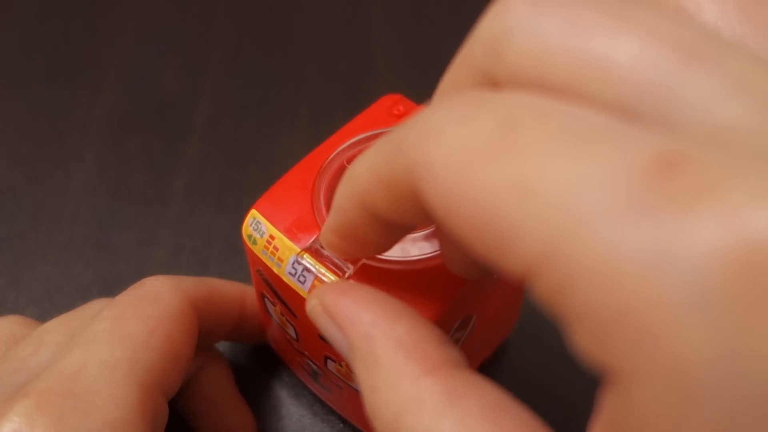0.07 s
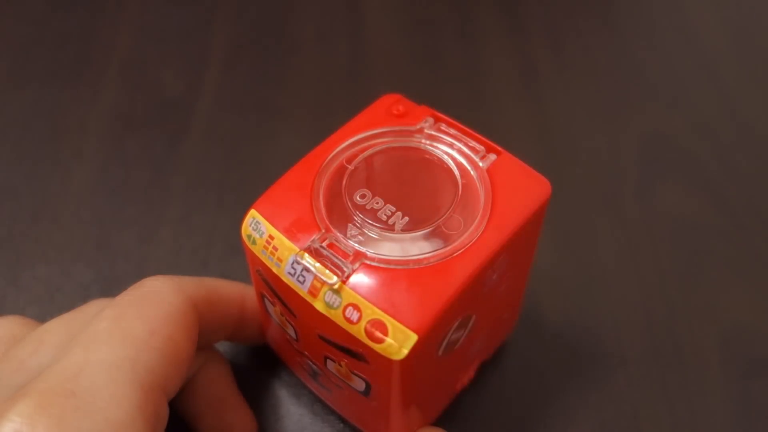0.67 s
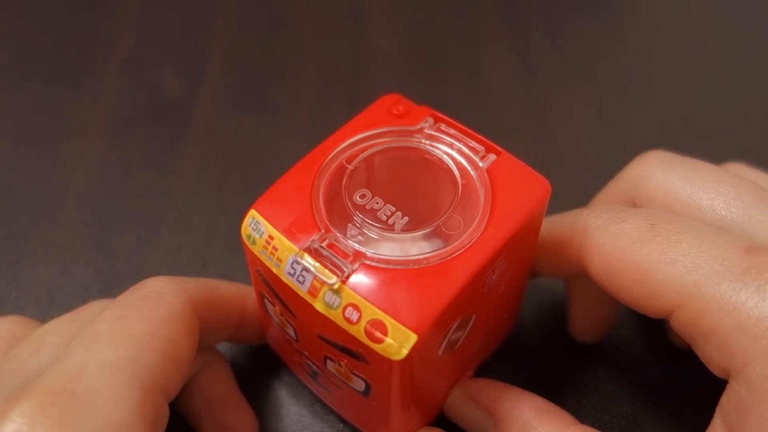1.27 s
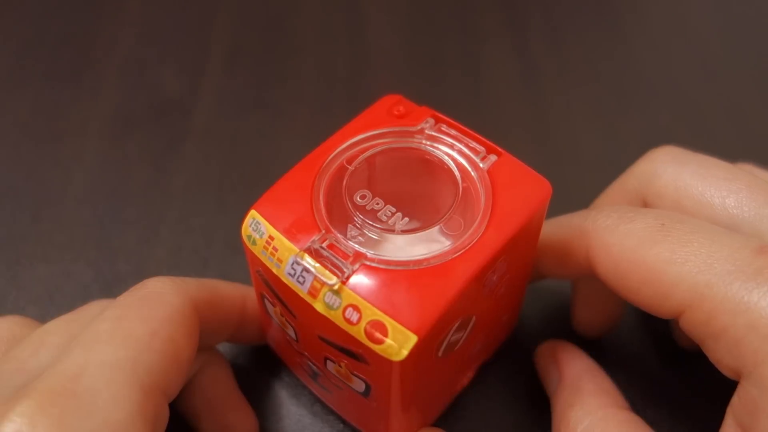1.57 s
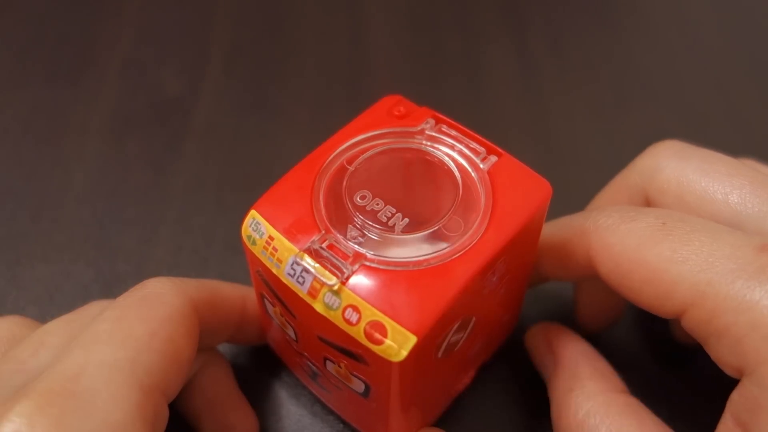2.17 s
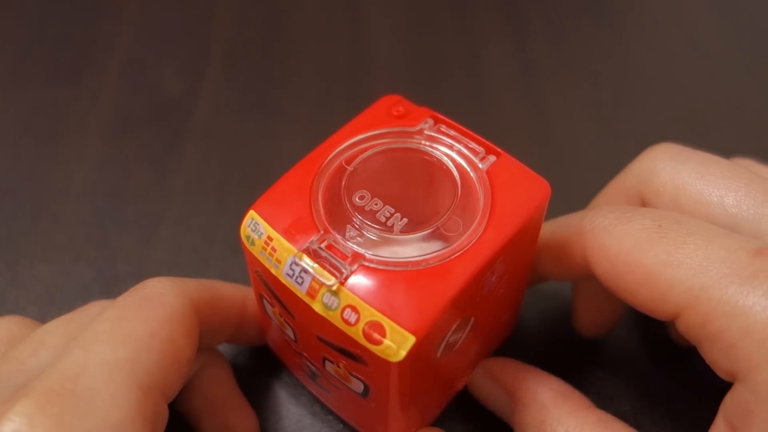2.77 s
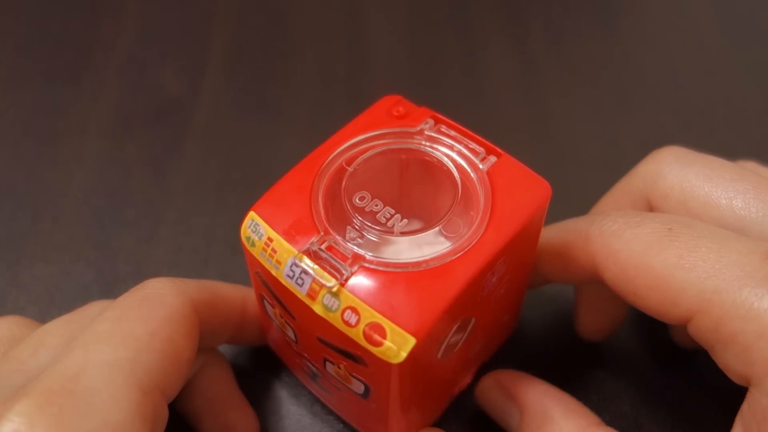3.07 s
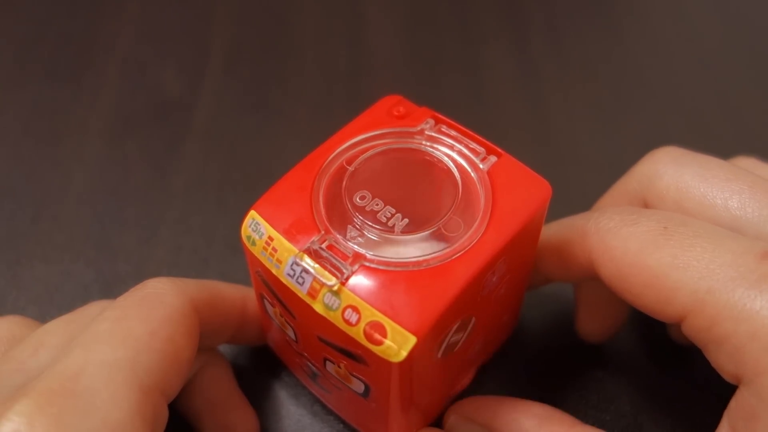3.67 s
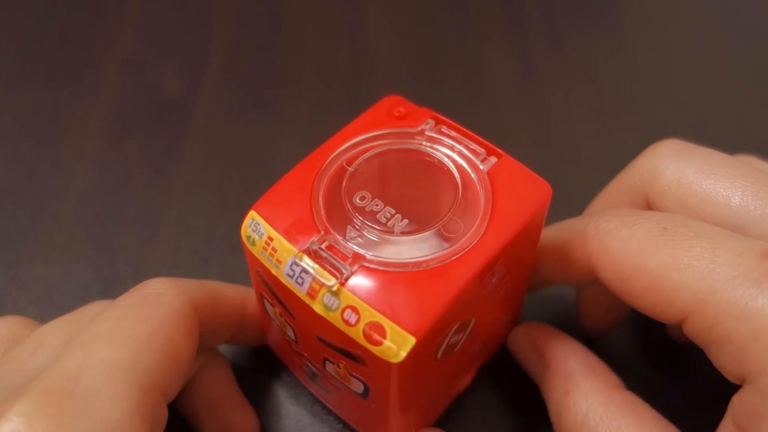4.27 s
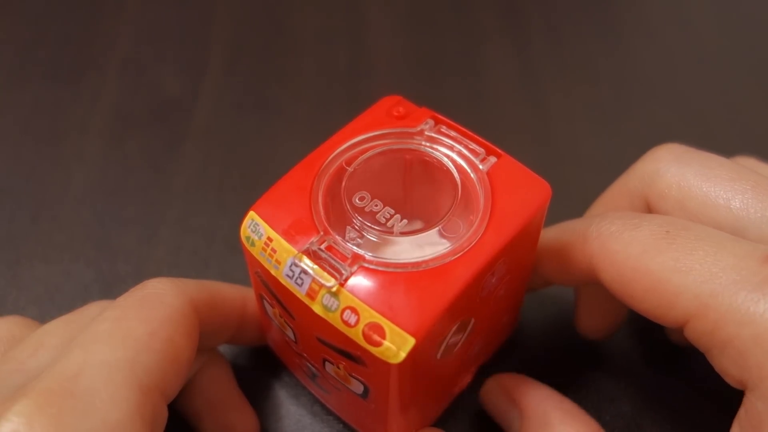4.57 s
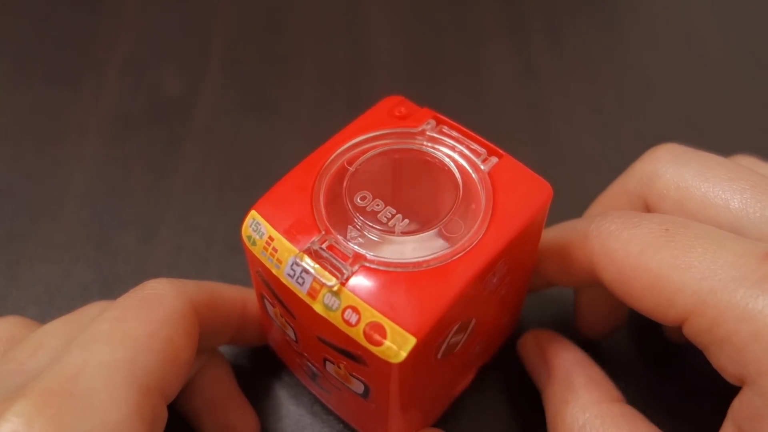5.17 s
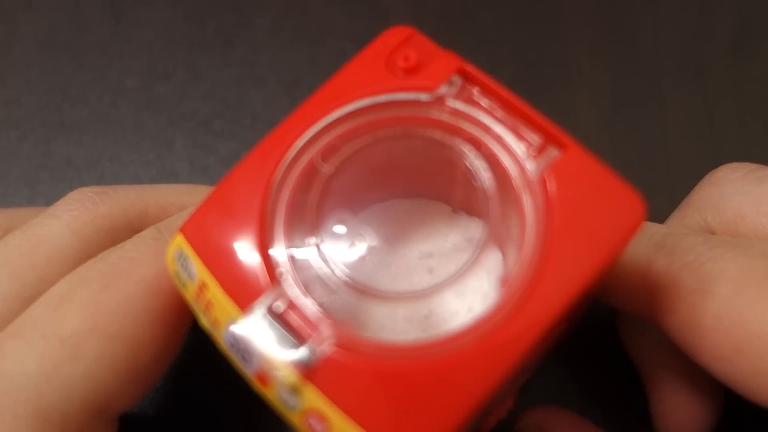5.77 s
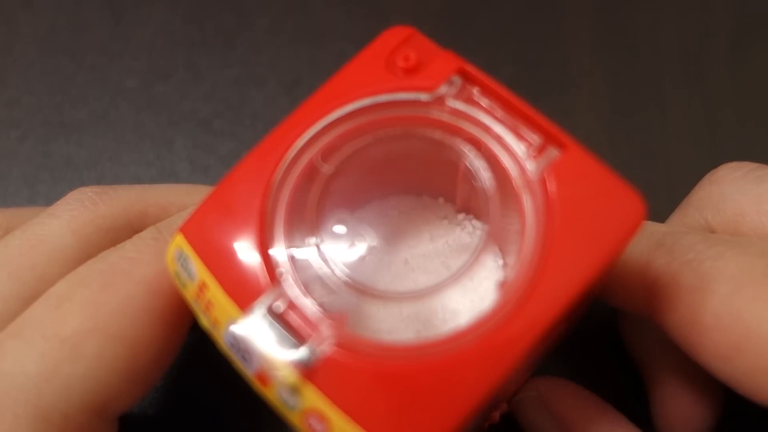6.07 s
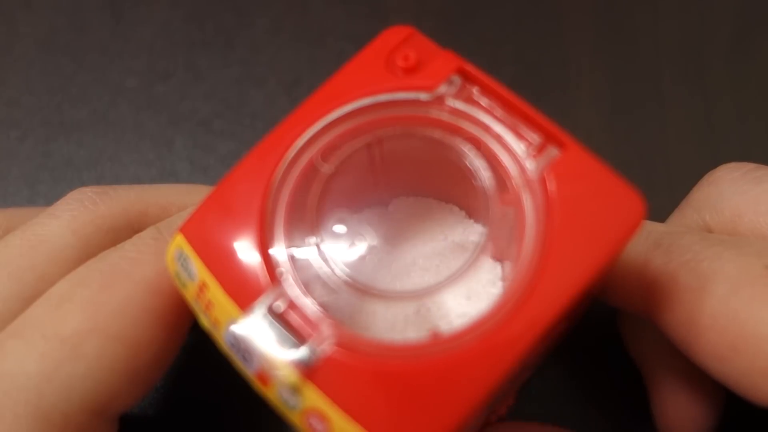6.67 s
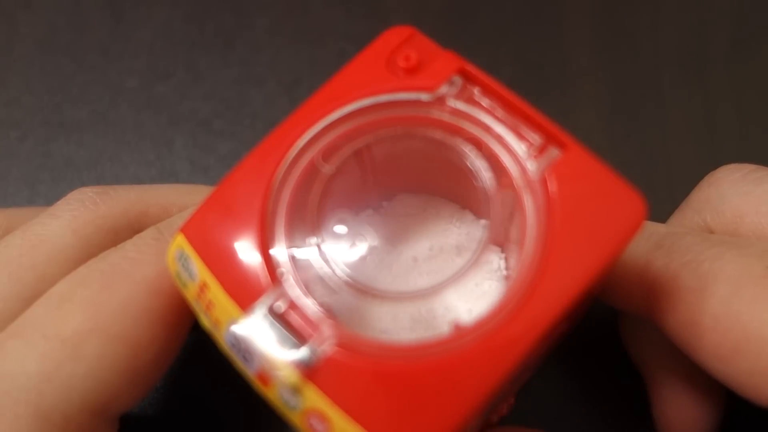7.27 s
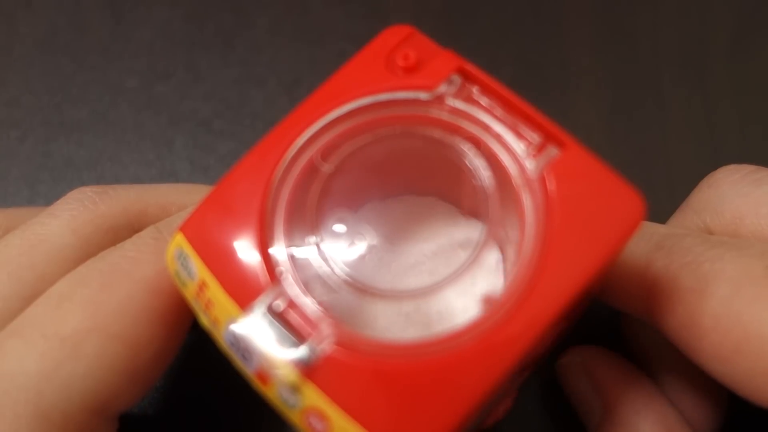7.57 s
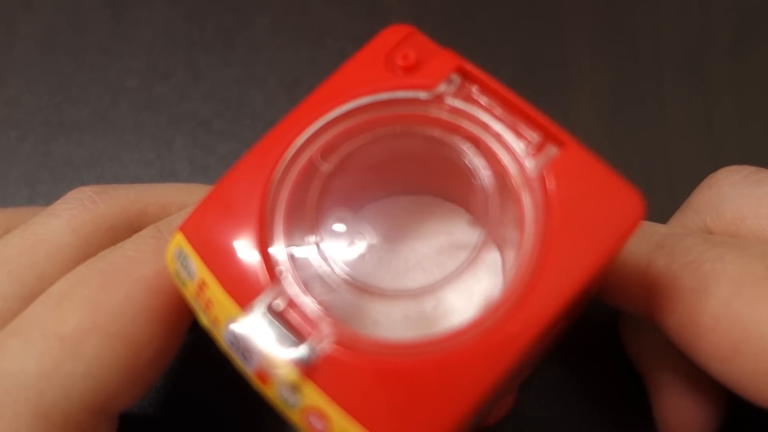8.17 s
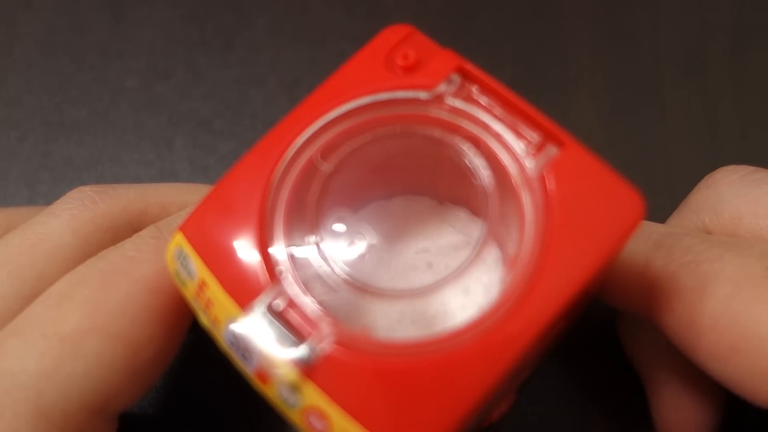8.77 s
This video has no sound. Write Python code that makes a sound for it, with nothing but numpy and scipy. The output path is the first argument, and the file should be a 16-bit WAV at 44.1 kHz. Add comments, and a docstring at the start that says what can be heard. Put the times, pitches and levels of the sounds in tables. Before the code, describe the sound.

A faint ring fades from a toy washing machine's plastic lid. Then a thumb cranks its gear wheel about twelve times, each stroke a short ratcheting chatter with sharp clacks and a hollow drum rumble. Light finger taps fall in between. After six strokes on a table, the toy is lifted near the stereo microphones and sounds brighter, louder and further right. The room is quiet.

```python
"""Cranking a toy washing machine

Close stereo pair in a quiet room. The lid has just shut; a thumb cranks the plastic gear wheel twelve
times: it takes up the slack, the gears bite, the push tires and the drum coasts to rest. Teeth chatter
in the thin shell, loose gears clack, and the spinning drum makes the hollow body rumble. For six
strokes the toy stands on a table; then it is held up near the mics, brighter and further right."""
import sys
import numpy as np
from scipy import signal
from scipy.fft import rfft, irfft
from scipy.io import wavfile
from scipy.ndimage import uniform_filter1d

SR = 44100
rng = np.random.default_rng(int(sys.argv[2]) if len(sys.argv) > 2 else 0)


def to_wav(s):
    """Save 16-bit WAV."""
    ch = np.atleast_2d(s).T  # columns
    pcm = np.round(np.clip(ch, -1, 1) * 32767)  # PCM
    wavfile.write(sys.argv[1], SR, pcm.astype(np.int16))


N = 398663
TIME = np.arange(N) / SR
HZ = np.fft.rfftfreq(N, 1 / SR)
LIFT_S = 5.53  # the toy leaves the table
GEAR_RISE_S = .011  # the teeth engage quickly

# Levels in the tables are relative, ahead of each layer's gain.
# thumb strokes: bite t/s, slack before it/s, push length/s, chatter level/dB, rumble level/dB,
# sag over the push/dB, chatter level in the slack/dB
STROKES = [(1.474, 0.085, .14, -34, -34.5, 14, -53.5), (2.176, .08, 0.28, -33, -33.5, 8, -55),
           (2.902, 0.074, .22, -28.5, -29, 14, -50.5), (3.635, 0.033, 0.31, -30, -32, 9.5, -51),
           (4.287, 0.08, 0.23, -32, -31, 7, -47.5), (4.968, .07, 0.32, -30, -30, 9, -51),
           (5.668, 0.054, .33, -27, -38, 14, -45), (6.23, .025, .5, -27.5, -38, 12.5, -50),
           (6.882, .06, .335, -27, -37, 5, -50), (7.503, .075, .37, -28, -38.5, 13, -45.5),
           (8.169, .06, .42, -25, -36, 12, -47.5), (8.715, .04, 0.3, -26.5, -39, 9.5, -47)]
# loudest clacks of the loose gears: t/s, crack level/dB, dull knock level/dB, sharp snap level/dB
CLACKS = [(1.479, -13, -51, -38), (1.6033, -31, -42, -62), (2.1807, -14, -56, -32.5),
          (2.1996, -17.5, -41, -30.5), (2.3276, -18, -55, -44), (2.4004, -21, -49, -59),
          (2.4355, -22.5, -36, -58), (2.5246, -37.5, -40, -71), (2.8861, -17, -34, -48),
          (2.9052, -16, -26, -25.5), (2.9733, -15, -29, -41), (3.0548, -19.5, -48, -57),
          (3.5974, -36, -43, -50), (3.759, -18, -52, -43), (3.8517, -17.5, -47, -55),
          (4.2978, -9.5, -39, -25), (4.405, -25, -35, -57), (4.4513, -24, -34, -53),
          (4.9721, -18.5, -34, -36), (5.002, -15.5, -34, -33), (5.131, -15, -30, -34.5),
          (5.1822, -16.5, -30.5, -33.5), (5.2126, -18.5, -28, -40), (5.667, -28, -50, -47),
          (5.7145, -25, -46, -50), (5.746, -12, -44, -36), (5.8004, -13, -19.5, -37),
          (5.8499, -15.5, -31.5, -42), (6.2326, -22, -32.5, -38), (6.2602, -19, -46, -46),
          (6.342, -11, -27, -31), (6.3923, -10.5, -21.5, -32), (6.4518, -14, -24.5, -37),
          (6.552, -15.5, -27, -45), (6.6416, -21.5, -34, -42), (6.7066, -20.5, -29, -62),
          (6.8858, -4.5, -20.5, -27.5), (6.9351, -9.5, -21, -15), (6.9676, -15, -25, -41),
          (7.0308, -22, -38, -48), (7.1348, -11, -44, -31), (7.198, -30, -29.5, -52),
          (7.211, -11, -23.5, -43), (7.5133, -9.5, -38, -33), (7.5786, -20, -19.5, -37),
          (7.6145, -12, -25, -33.5), (7.8206, -19.5, -28, -60), (8.1705, -7.5, -41, -26.5),
          (8.2368, -14.5, -28, -35), (8.31, -7, -17, -21.5), (8.4583, -15.5, -24, -38.5),
          (8.5633, -20.5, -36, -36), (8.5855, -12.5, -18, -33.5), (8.7155, -19, -31, -32),
          (8.939, -19, -32, -41)]
# fingers and drum tapping wheel and body: t/s, click level/dB, soft bump level/dB
TAPS = [(1.39, -36.5, -28), (1.886, -66, -49.5), (1.994, -53.5, -61), (2.094, -35.5, -42),
        (2.273, -45, -19.5), (2.61, -46, -44.5), (2.816, -26, -38), (3.235, -38.5, -35), (3.468, -42, -40),
        (3.526, -45.5, -32), (3.753, -46, -23), (4.22, -32.5, -34), (4.712, -43.5, -38.5),
        (4.883, -31, -46), (4.903, -23.5, -47), (5.02, -30, -21), (5.356, -32, -30), (5.614, -22, -42.5),
        (6.043, -27.5, -51), (6.06, -34.5, -66), (6.094, -33.5, -56), (6.127, -52, -54),
        (6.747, -30, -42.5), (6.822, -28.5, -43.5), (7.287, -31, -48), (7.415, -25, -53),
        (7.427, -22.5, -37), (7.488, -24.5, -54), (8.044, -23.5, -49), (8.113, -30, -57),
        (8.673, -29.5, -48), (8.755, -34, -31.5)]
# squeaks of rubbing plastic: t/s, f/Hz, level/dB, length/s
SQUEAKS = [(.262, 2390, -60, 0.017), (3.989, 3264, -37, 0.032)]
# shell resonances, on the table and in the hand: f/Hz, half-width/Hz, left level/dB, right level/dB
SHELL_STANDING = [(506, 540, -15.5, -11), (848, 63, -8, -13), (1153, 290, -11.5, -8), (1436, 48, -3, -2.5),
                  (1714, 180, -20, -10.5), (2425, 68, -1.5, 1.5), (2695, 204, -0.5, -0.5),
                  (3050, 47, -6, -7), (3135, 640, -44, -4), (3610, 660, -11.5, -36), (4720, 28, -56, -5),
                  (5380, 310, -18, -16.5), (6110, 1130, -15.5, -16.5), (7240, 350, -15.5, -18.5),
                  (9550, 1500, -29.5, -25.5), (13200, 940, -45, -44)]
SHELL_HELD = [(500, 127, -36, -25.5), (818, 94, -24, -19.5), (1127, 205, -10, -12.5),
              (1302, 107, -13.5, -7.5), (1512, 123, -12, -10), (2086, 126, -17, -11), (2350, 126, -16, -19),
              (2890, 180, -10, -16), (3006, 250, -21.5, -4.5), (3700, 160, -13, -11),
              (4157, 300, -17.5, -13.5), (5610, 570, -23, -18.5), (6590, 153, -17.5, -21),
              (7450, 500, -27.5, -24.5), (8760, 1660, -33, -31.5), (13400, 1100, -49.5, -44.5)]
# low resonances of the body with the table top, and in the hand: f/Hz, half-width/Hz, level/dB
BODY_STANDING = [(140, 1.8, -8), (179, 18, -12), (237.6, 8.9, -0.5), (275, 40, -8.5), (336, 11, -7.5),
                 (384, 14, -5.5), (407.3, 19.7, 0.5)]
BODY_HELD = [(154.5, 11, -24), (240.4, 5.9, -9.5), (289, 20.3, -6), (346, 19.5, -2.5), (397.7, 25, 0.5)]
# something small still ringing after the lid has shut: f/Hz, level/dB, T60/s
LID_RING = [(172, -5, 0.35), (506, -18, .3), (1300, -4, 0.34), (1380, -2, 0.34), (1450, -7, 0.37),
            (2640, -5, 0.16)]
# fingers rubbing the lid and letting go: t/s, level/dB
FINGER_RUB = [(0.0, -48.5), (0.096, -62), (0.236, -67.5), (0.262, -59), (0.358, -82), (0.45, -81)]
# likeness of the two mics, for the toy and for the room tone: f/Hz, correlation
TOY_LIKENESS = [(300, 0.95), (1500, 1), (3000, 0.93), (5000, 0.7), (9000, 0.17), (15000, 0.19)]
ROOM_TONE_LIKENESS = [(60, 1), (240, 0.22), (950, -0.42), (3770, -0.13), (15000, 0.05)]
# reverberation time of the room: f/Hz, T60/s
ROOM_T60 = [(200, 0.15), (500, 0.73), (2000, 0.44), (6000, 0.22), (14000, 0.26)]
# spectrum of the room tone: f/Hz, level/dB
ROOM_TONE = [(15, -52), (25, -27), (123, -7.5), (180, -7.5), (217, -8.5), (714, -15), (4250, -21.5),
             (4870, -21), (14800, -25.5), (16000, -40)]


def gears(bind_db=3.5, hardening=0.35, scrape=.2, contact_s=.001):
    """Each tooth strikes with a very short chatter; between strikes the teeth slide and bind in clumps."""
    drive = gear_drive()
    strikes = fade(tooth_hits(drive, slow_hz=60.03, fast_hz=271, jitter=.5, spread_db=1.2), contact_s)
    binding = amp(bind_db * np.tanh(wander(700)))
    force = drive * binding * np.sqrt(strikes / strikes.mean() + scrape) * contact_noise(patchy_db=1.5)
    soft = uniform_filter1d(uniform_filter1d(force, size=5), size=3)
    force = soft + (force - soft) * (drive / amp(-36.5)) ** hardening  # harder contacts are brighter
    tilt = [(500, -4.1), (1300, -3.05), (3000, 0.96), (7000, 0.27), (14000, -0.14)]
    return amp(-1.5) * shell(force, tilt, held_db=1)


def stroke(bite_s, slack_s, push_s, push_db, sag_db, slack_db, rise_s, coast_db_per_s):
    """Gain of one stroke: quiet slack, tension building to the bite, a tiring push, a coast to rest."""
    t = TIME - bite_s
    onset = np.clip((t + slack_s) / GEAR_RISE_S, 0, 1)
    engaged = np.exp(np.minimum(t, 0) / rise_s)
    drop_db = sag_db * np.clip(t / push_s, 0, 1) + coast_db_per_s * np.maximum(t - push_s, 0)
    return onset * amp(slack_db + engaged * (push_db - slack_db) - drop_db)


def gear_drive():
    """How hard the thumb presses the teeth together."""
    return sum(stroke(s, slack, push, db, sag, slack_db, GEAR_RISE_S, coast_db_per_s=270)
               for s, slack, push, db, _, sag, slack_db in STROKES)


def tooth_hits(drive, slow_hz, fast_hz, jitter, spread_db):
    """Energy of tooth impacts: quicker when driven hard, uneven in time and size, steady on average."""
    speed = np.sqrt(drive / drive.max())
    rate_hz = (slow_hz + (fast_hz - slow_hz) * speed) * np.exp(jitter * wander(150))
    teeth = np.floor(np.cumsum(rate_hz) / SR)
    energy = np.diff(teeth, prepend=0) * amp(spread_db * rng.standard_normal(N)) ** 2
    nearby_energy = fade(energy, 0.01) + fade(energy[::-1], 0.037)[::-1]
    return energy / (nearby_energy + 1e-6)


def contact_noise(patchy_db):
    """Micro-impacts between two teeth; each contact point favours other pitches."""
    spectra = signal.stft(noise_pair(TOY_LIKENESS), nperseg=128)[2]
    patches = uniform_filter1d(rng.standard_normal(spectra.shape[1:]), size=7, axis=0)
    patches = unit_rms(uniform_filter1d(patches, size=14, axis=1))
    return unit_rms(signal.istft(spectra * amp(patchy_db * patches), nperseg=128)[1][:, :N])


def clacks(crack_s=0.0018, knock_s=0.0025, snap_s=0.0018, rebound_s=0.0054, rebound_db=-7):
    """Gear slack closes with a crack and a lighter rebound; soft contacts knock, hard edges snap."""
    s, crack_db, knock_db, snap_db = np.transpose(clack_events())
    rebound_at = s + rebound_s * rng.uniform(.7, 1.4, len(s))
    blows = spikes(s, amp(crack_db) ** 2) + spikes(rebound_at, amp(crack_db + rebound_db) ** 2)
    crack = np.sqrt(fade(blows, crack_s)) * contact_noise(patchy_db=1)
    knock = np.sqrt(fade(spikes(s, amp(knock_db) ** 2), knock_s)) * noise_pair(TOY_LIKENESS)
    snap = np.sqrt(fade(spikes(s, amp(snap_db) ** 2), snap_s)) * contact_noise(patchy_db=4.5)
    crack_tilt = [(600, -7), (1500, -34), (3000, 3), (5000, 3.5), (7500, 0.5), (11000, -6)]
    knock_tilt = [(500, -9), (800, 4), (1500, 1.5), (2300, 3.5), (3200, -18.5)]
    snap_tilt = [(3000, -30), (5500, -12), (8000, 0), (10000, -3), (14000, 3)]
    return (amp(-6.5) * shell(crack, crack_tilt, held_db=0.5)
            + amp(-2.5) * shell(knock, knock_tilt, held_db=-0.5)
            + amp(6.5) * shell(snap, snap_tilt))


def clack_events(rattle_per_s=14, above_drive_db=12, spread_db=2):
    """Loud clacks, taps and a chance rattle that follows the push, in the columns of CLACKS."""
    chance, scatter = rng.random(N), rng.standard_normal(N)
    drive = gear_drive()
    at = np.flatnonzero((chance < rattle_per_s / SR) & (drive > .002))
    rattle_db = 20 * np.log10(drive[at]) + above_drive_db - spread_db * scatter[at]
    rattle = [(s, db, db - 14, db - 40) for s, db in zip(TIME[at], rattle_db)]
    taps = [(s, db, db - 5, db - 22.5) for s, db, _ in TAPS]
    return list(CLACKS) + taps + rattle


def drum():
    """The drum follows the strokes sluggishly and shakes the hollow body with small uneven knocks."""
    drive = sum(stroke(s, slack, push, db, sag, slack_db=db - 15, rise_s=.04, coast_db_per_s=170)
                for s, slack, push, _, db, sag, _ in STROKES)
    energy = tooth_hits(drive, slow_hz=70.42, fast_hz=198.15, jitter=.5, spread_db=5)
    knocks = unit_rms(np.sqrt(energy) * rng.choice([-1, 1], N))
    rumble = body(knocks, tilt=[(40, -12), (90, -28), (140, -5), (435, -2), (480, -10.5), (900, -2.5)])
    # the hand keeps the effort steady over a few knocks
    power = uniform_filter1d(uniform_filter1d(rumble[0] ** 2, size=4500), size=1500)
    return amp(-0.35) * drive * rumble / np.sqrt(abs(power) + 1e-3)


def bumps():
    """The soft push of each tap rings the low resonances of the body."""
    s, _, bump_db = np.transpose(TAPS)
    tilt = [(30, -48), (70, -20), (150, -10.5), (430, -5), (520, -15)]
    return amp(19) * body(spikes(s, amp(bump_db)), tilt, held_db=8)


def shell(force, tilt, held_db=0):
    """The thin plastic shell rings in the mids and treble."""
    return resonate(force, SHELL_STANDING, SHELL_HELD, tilt, held_db)


def body(force, tilt, held_db=0):
    """The hollow body rings low."""
    return resonate(force, BODY_STANDING, BODY_HELD, tilt, held_db)


def resonate(force, standing, held, tilt, held_db):
    """The toy rings one way on the table and another way in the hand, near the mics."""
    lifted = TIME > LIFT_S
    on_table = convolve(force * ~lifted, ringing(standing, tilt))
    in_hand = convolve(force * lifted, ringing(held, tilt))
    return on_table + amp(held_db) * in_hand


def ringing(modes, tilt, size=16384):
    """Unit-energy response of steep-sided resonances, coloured by tilt: f/Hz, level/dB."""
    hz, modes = np.fft.rfftfreq(size, 1 / SR), np.array(modes, float)
    centre_hz, half_width_hz, level_db = modes[:, :1], modes[:, 1:2], modes[:, 2:]
    peaks = 1 / (1 + ((hz - centre_hz) / half_width_hz) ** 2) ** 2
    gain = np.sqrt(amp(level_db.T) ** 2 @ peaks) * amp(curve(tilt, hz))
    # minimum phase: nothing rings before the blow
    cepstrum = irfft(np.log(gain + 1e-6))
    cepstrum[:, 1:size // 2] *= 2
    cepstrum[:, size // 2 + 1:] = 0
    response = irfft(np.exp(rfft(cepstrum)))[:, :size // 2]
    return unit_rms(response) / np.sqrt(size / 2)


def squeaks(drift_hz=190, slips_per_s=300):
    """Plastic sticks and slips on one resonance, scratchy and unsteady in pitch."""
    drift = drift_hz * wander(45)
    slips = unit_rms(fade(rng.random(N) < slips_per_s / SR, 0.0021))
    tones = np.zeros(N)
    for s, hz, db, length in SQUEAKS:
        swell = amp(db) * np.exp(-(2 * (TIME - s) / length) ** 2)
        tones += swell * np.sin(2 * np.pi * np.cumsum(hz + drift) / SR)
    return slips * tones


def lid(attack_s=0.0014):
    """The last ring from shutting the lid, and fingertips sliding off it."""
    ring = sum(amp(db - 60 * TIME / t60) * np.sin(2 * np.pi * (hz * TIME + rng.random()))
               for hz, db, t60 in LID_RING)
    tilt = [(30, -17.5), (75, -6), (200, -4), (450, -7), (900, -16.5), (2600, -17.5), (9000, -34)]
    rub = noise_pair(TOY_LIKENESS, amp(curve(tilt, HZ)))
    touch = amp(np.interp(TIME, *np.transpose(FINGER_RUB), right=-np.inf))
    return (amp(-47.5) * ring + amp(-1.5) * touch * rub) * np.minimum(TIME / attack_s, 1)


def reflections(x, size=26000, predelay_s=.004):
    """Sparse echoes from the room, each band dying at its own speed."""
    echoes = rng.standard_normal((2, size)) * (rng.random((2, size)) < .08)
    echoes[:, :round(predelay_s * SR)] = 0
    hz, t, spectra = signal.stft(echoes, SR, nperseg=256)
    same = np.sinc(hz[:, None] / 4500)  # long waves reach both mics alike
    spectra[1] = same * spectra[0] + np.sqrt(1 - same ** 2) * spectra[1]
    decay = amp(-60 * t / curve(ROOM_T60, hz)[:, None])
    tail = signal.istft(spectra * decay, SR, nperseg=256)[1]
    return convolve(x, tail / np.linalg.norm(tail[0]))


def room_tone(crossfade_s=0.24):
    """Quiet air at the mics; its low murmur fades away around 5.5 s."""
    hush = amp(-61.5) * noise_pair(ROOM_TONE_LIKENESS, amp(curve(ROOM_TONE, HZ)))
    thin = irfft(rfft(hush) * amp(curve([(25, -9), (70, -32), (150, -13), (400, 4.5)], HZ)), N)
    lifted = np.clip((TIME - LIFT_S) / crossfade_s + 1, 0, 1)
    return hush + lifted * (thin - hush)


def noise_pair(likeness, gain=1):
    """Noise at the two mics, partly alike, with an optional colour."""
    common, apart = rfft(rng.standard_normal((2, N)))
    same = np.clip(curve(likeness, HZ), -1, 1)
    mid, side = common * np.sqrt(1 + same), apart * np.sqrt(1 - same)
    return unit_rms(irfft(np.array([mid + side, mid - side]) * gain, N))


def wander(samples):
    """Random drift of rms 1, smoothed over so many samples."""
    return unit_rms(uniform_filter1d(rng.standard_normal(N), size=samples))


def spikes(times, sizes):
    """Single-sample pushes at the given times."""
    return np.bincount(np.clip(np.round(times * SR).astype(int), 0, N - 1), sizes, N)


def fade(x, seconds):
    """Gives each push an exponential tail."""
    return signal.lfilter([1], [1, -np.exp(-1 / (seconds * SR))], x + 1e-20)


def convolve(x, response):
    """Passes a sound through a mono or stereo response."""
    return signal.oaconvolve(np.atleast_2d(x), np.atleast_2d(response), axes=1)[:, :N]


def curve(points, hz):
    """Reads a table on a log-frequency axis."""
    f, value = np.transpose(points)
    return np.interp(np.log(hz + 1), np.log(f + 1), value)


def amp(db):
    """Decibels to gain."""
    return 10 ** (np.asarray(db) / 20)


def unit_rms(x):
    """Scales to rms 1."""
    return x / np.sqrt(np.mean(x ** 2) + 1e-20)


def scene(low_cut_hz=130):
    """The toy up close, its small shell giving off little bass, with the quiet room behind it."""
    low_cut = signal.butter(1, low_cut_hz, "high", fs=SR, output="sos")
    toy = signal.sosfilt(low_cut, gears() + clacks()) + bumps() + squeaks()
    return toy + amp(-13) * reflections(toy) + drum() + lid() + room_tone()


def record(dry, ceiling=.75, top_hz=15900):
    """The very highest peaks are rounded off; a steep low-pass limits the band."""
    rounded = dry / (1 + (dry / ceiling) ** 4) ** .25
    low_pass = signal.firwin(301, top_hz, window=("kaiser", 9), fs=SR)
    return signal.oaconvolve(rounded, low_pass[None], "same", axes=1)


dry = scene()
out = record(dry)
to_wav(out)
```